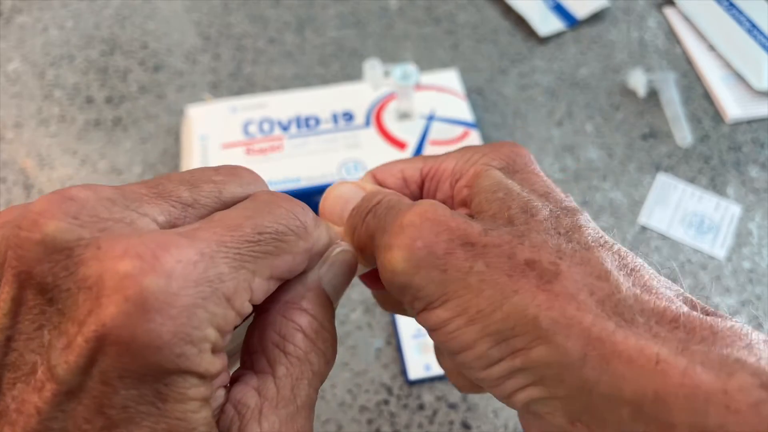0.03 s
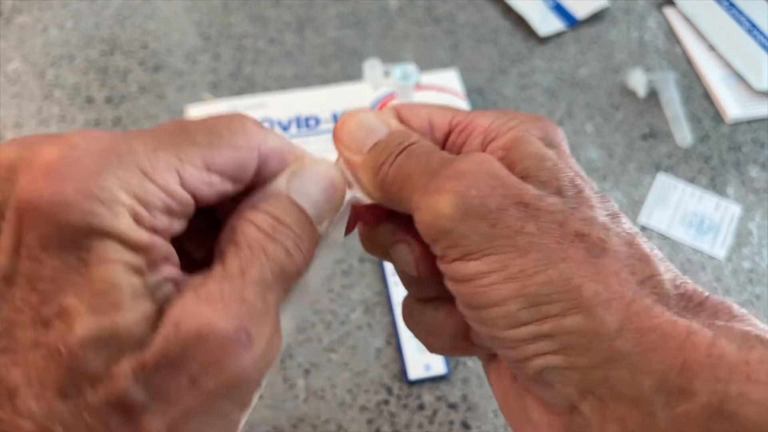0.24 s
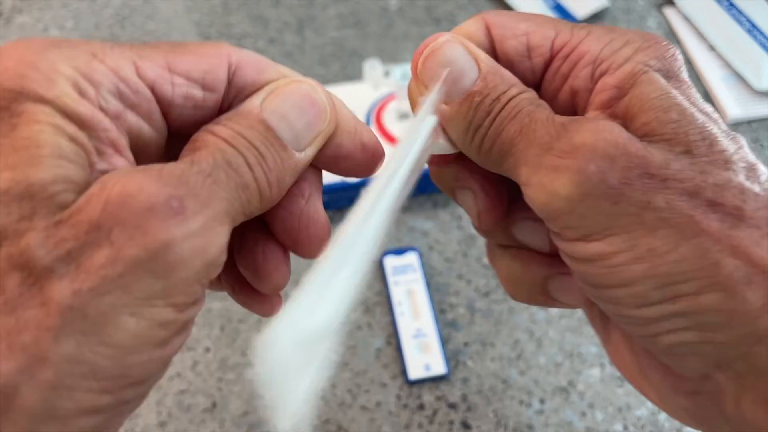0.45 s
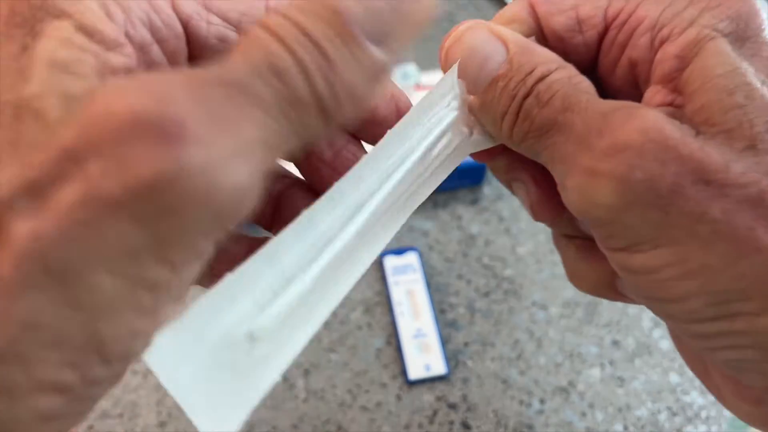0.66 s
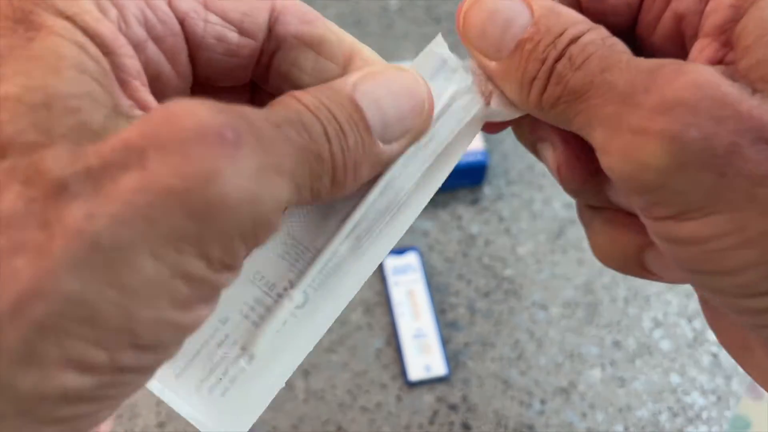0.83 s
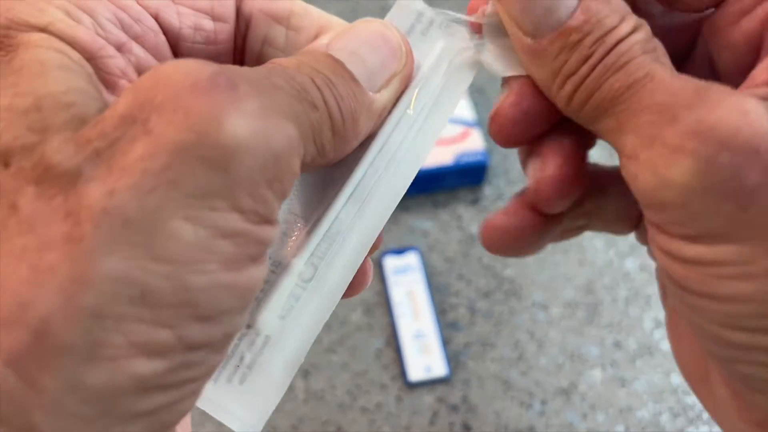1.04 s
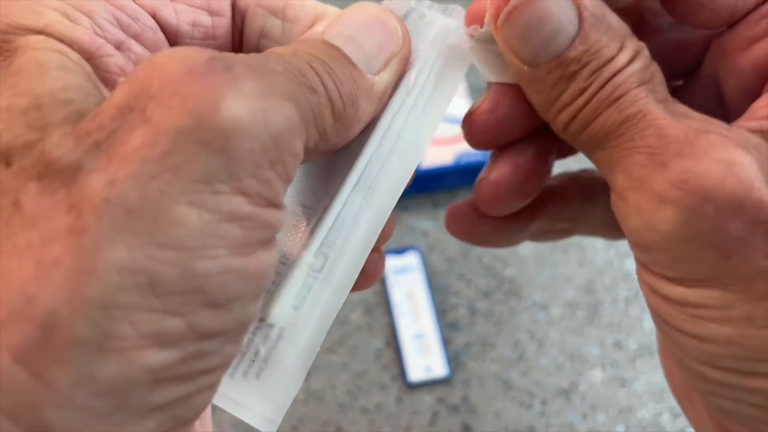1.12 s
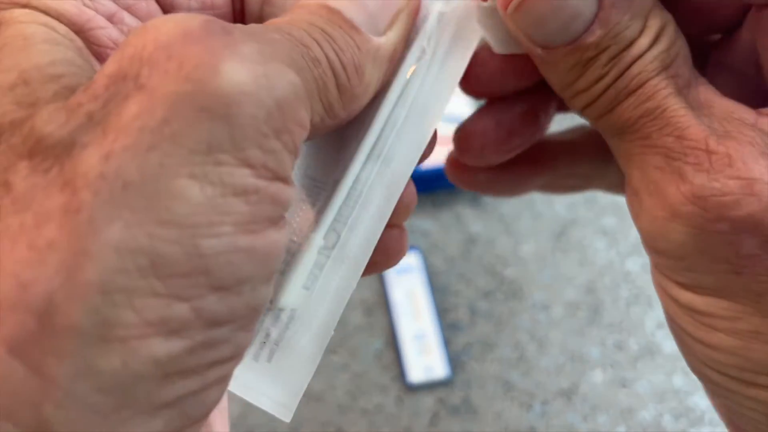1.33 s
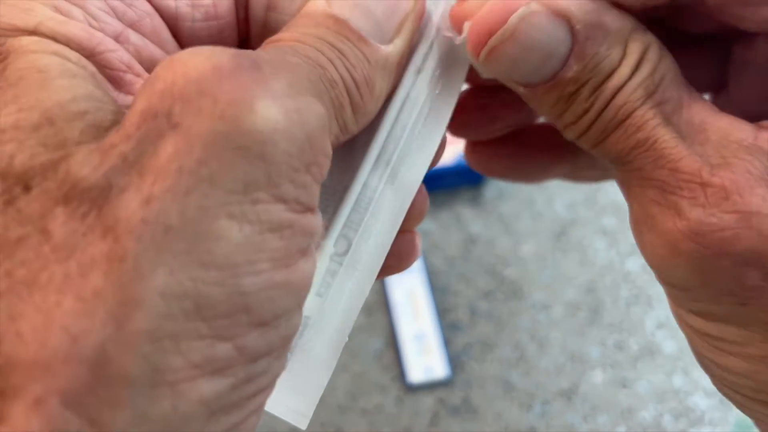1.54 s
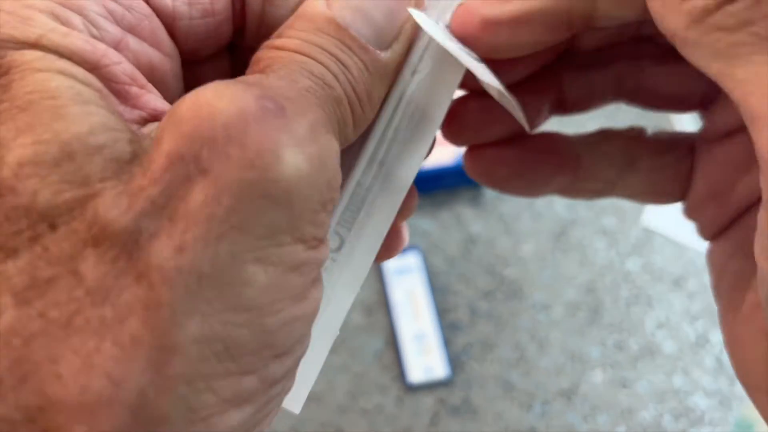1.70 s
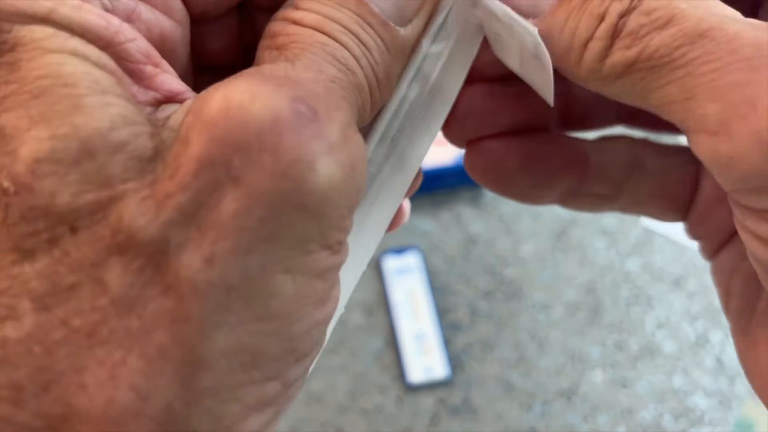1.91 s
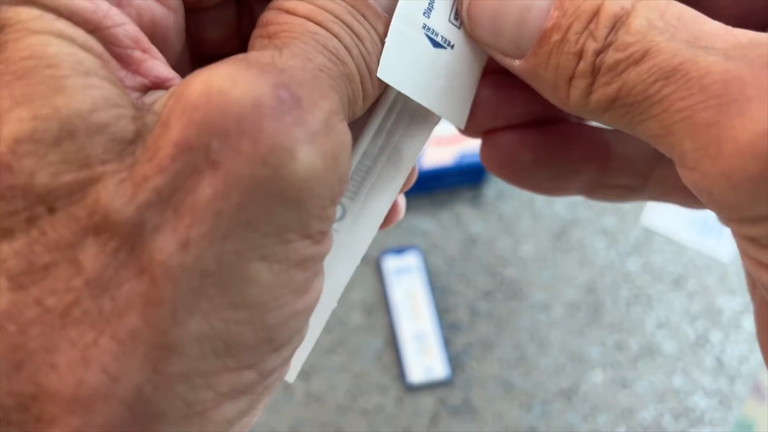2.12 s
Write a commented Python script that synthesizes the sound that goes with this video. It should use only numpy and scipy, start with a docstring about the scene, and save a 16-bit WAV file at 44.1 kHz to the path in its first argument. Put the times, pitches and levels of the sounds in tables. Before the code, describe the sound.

In a quiet kitchen with a faint electrical hum, a small paper wrapper is pulled apart by hand near a stereo microphone. A brief rising tear ends in a papery flick. Thin, bright crackles and ticks then come in stops and starts, with one louder snap past the middle and a few more near the end. A soft rustle and a slight room echo lie underneath.

```python
"""Low mains hum in a quiet kitchen; almost at once, fingers peel open a small paper wrapper close by.
The glued seam lets go in runs of tiny fibre breaks, the stiff paper snaps as it buckles,
and once the fingers slip off the edge with a flick. Skin rubs on the paper and the swinging
wrapper pushes air. A short room tail lies behind; a stereo microphone pair picks it all up."""
import sys
import numpy as np
from scipy import signal
from scipy.fft import rfft, irfft
from scipy.io import wavfile

SR = 44100
rng = np.random.default_rng(int(sys.argv[2]) if len(sys.argv) > 2 else 0)


def bounce(signal):
    """Save signal as a 16-bit WAV file at the path given by the first command-line argument."""
    frames = np.transpose(np.atleast_2d(signal))
    limited = np.clip(frames, -1, 1)
    pcm = np.round(limited * 32767).astype(np.int16)
    wavfile.write(sys.argv[1], SR, pcm)


N = 95564
TIME = np.arange(N) / SR
CLICK_GAIN = np.sqrt(.004 * SR)  # unit energy to unit rms over 4 ms


def amp(db):
    """Decibels to gain."""
    return 10 ** (np.asarray(db) / 20)


def value_at(points, hz):
    """Interpolates a table on a log-frequency axis."""
    freq_hz, value = np.transpose(points)
    return np.interp(np.log(hz + 1), np.log(freq_hz + 1), value)


def unit(x):
    """Scales each channel to unit energy."""
    return x / np.sqrt(np.sum(x ** 2, axis=-1, keepdims=True) + 1e-20)


def add(mix, start_s, sound):
    """Mixes a sound in at start_s."""
    part = mix[:, max(round(start_s * SR), 0):][:, :sound.shape[1]]
    part += sound[:, :part.shape[1]]


def colour(x, taps):
    """Convolves with shared or per-channel taps."""
    return signal.fftconvolve(np.atleast_2d(x), np.atleast_2d(taps), axes=1)


def response(spectrum, ring_hz=None, q=1, size=2048):
    """Minimum-phase, unit-energy impulse response with an optional resonance."""
    hz = abs(np.fft.fftfreq(size, 1 / SR)) + 1
    gain = amp(value_at(spectrum, hz))
    if ring_hz:
        gain = gain / np.hypot(1, q * (hz / ring_hz - ring_hz / hz))
    log_gain = np.log(np.maximum(gain, 1e-5))
    minimum_phase = np.exp(np.conj(signal.hilbert(log_gain)))
    return unit(np.fft.ifft(minimum_phase).real[:size // 2])


def wander(t, low_hz, high_hz):
    """Random drift from eight sines, rms about one."""
    return sum(np.sin(2 * np.pi * (hz * t + rng.random())) for hz in np.geomspace(low_hz, high_hz, 8)) / 2


# Mains hum: pitch_hz, level_db
HUM_TONES = [(58.5, -62.5), (119.8, -57.5)]
# Room air: freq_hz, gain_db
AIR_SPECTRUM = [(20, -39.5), (45, -6.5), (62, 9), (90, -3.5), (160, -6), (300, -17.5), (700, -28),
                (1200, -30), (3500, -31.5), (6000, -31), (7500, -25), (11000, -28), (15500, -32),
                (17000, -51)]


def hum_and_air(air_db=-64.0, waver=0.12, air_width=0.087):
    """An appliance hums and wavers a little over the still air of the kitchen."""
    hum = 0
    for pitch_hz, level_db in HUM_TONES:
        level = amp(level_db) * np.sqrt(2) * (1 + waver * wander(TIME, low_hz=.5, high_hz=6))
        hum += level * np.sin(2 * np.pi * (pitch_hz * TIME + rng.random()))
    air = rng.standard_normal(N) + air_width * rng.standard_normal((2, N))
    return hum + amp(air_db) * colour(air, response(AIR_SPECTRUM, size=8192))[:, :N]


def fibre_breaks(count, per_s, spread_db, hiss):
    """Fibres part at random with uneven strength over a smooth sliding hiss; unit rms."""
    strength = amp(spread_db * np.minimum(rng.exponential(1, count), 3))
    clicks = strength * rng.choice([-1, 1], count) * (rng.random(count) < per_s / SR)
    sliding = hiss * rng.standard_normal(count) / np.sqrt(count)
    return unit(unit(clicks) + sliding) * np.sqrt(count)


def shiver(decay_s, wave_gain, bounce_gain=0.621, bounce_s=.0009, size=400):
    """One break, its bounce off the hand, and waves in the sheet that reach each side differently."""
    t = np.arange(size) / SR
    kick = wave_gain * unit(rng.standard_normal((2, size)) * np.exp(-t / decay_s))
    kick[:, 0] = 1
    kick[:, round(bounce_s * rng.uniform(.7, 1.4) * SR)] += bounce_gain
    return kick


# Breaking fibres: freq_hz, gain_db
FIBRE_SPECTRUM = [(1200, -42), (2600, -4.5), (4000, -5.5), (6500, -4), (8500, 1.5), (10000, -5),
                  (11500, 1.5), (13000, -11.5), (15500, -1.5), (17000, -27.5)]
# Sheet body: freq_hz, gain_db
SHEET_SPECTRUM = [(100, -8), (250, -5), (550, 3.5), (950, -4), (1450, 5), (1900, 0), (2400, 3.5),
                  (3400, -2.5), (5200, -16), (8000, -15.5)]
# Seam peels or paper slides: start_s, end_s, level_db, swell_db, body_relative_db
SEAM_PULLS = [(0.147, 0.198, -55.5, 8.5, -4.5), (0.209, 0.29, -50, -14, -12),
              (0.283, 0.385, -41.5, 6.5, -11), (0.382, 0.393, -31.5, 8.5, -4.5),
              (0.689, 0.698, -53.5, 3, -5), (0.706, 0.719, -43.5, -9, -5.5), (0.731, 0.784, -52.5, -4, -10),
              (0.837, 0.896, -52.5, -5.5, -8), (0.889, 1.003, -47.5, 2.5, -14.5),
              (1.039, 1.106, -37.5, -0.5, -15), (1.158, 1.194, -45.5, -3.5, -13),
              (1.278, 1.349, -56.5, 2, -9), (1.455, 1.493, -44.5, 2, -18), (1.605, 1.679, -50.5, -4.5, -14),
              (1.772, 1.872, -64, -2, -1), (1.868, 1.974, -53, -4, -11), (2.056, 2.073, -43, -14, -17.5)]


def peeling(body_trim_db=-1, unsteady_db=1.47, base_per_s=1500, usual_db=-50, doubling_db=4.5):
    """Each pull is a swelling or fading run of fibre breaks, heard directly and through the sheet."""
    out, sheet = np.zeros((2, N)), response(SHEET_SPECTRUM)
    for start_s, end_s, level_db, swell_db, body_relative_db in SEAM_PULLS:
        length_s = end_s - start_s
        ramp_s = 0.00226 + 0.0496 * length_s
        t = np.arange(0, length_s + 4 * ramp_s, 1 / SR)
        uneven_glue_db = unsteady_db * wander(t, low_hz=20, high_hz=160)
        level = amp(level_db + swell_db * (np.minimum(t / length_s, 1) - .5) + uneven_glue_db)
        gate = np.minimum(t / ramp_s, 1) * np.exp(-np.maximum(t - length_s, 0) / ramp_s)
        # Harder pull: faster, smoother peel.
        per_s = base_per_s * 2 ** (max(level_db - usual_db, 0) / doubling_db)
        run = fibre_breaks(len(t), per_s, spread_db=5, hiss=.5) * level * gate
        # Taut sheet: bright and thin. Slack sheet: dull and full.
        tilt_db_per_octave = 0.6991 * (-11 - body_relative_db)
        fibres = response([(hz, db + tilt_db_per_octave * np.log2(hz / 7500)) for hz, db in FIBRE_SPECTRUM])
        grip = shiver(decay_s=.0005, wave_gain=.3, bounce_gain=.3)
        add(out, start_s, colour(run, unit(colour(grip, fibres))))
        add(out, start_s, amp(body_trim_db + body_relative_db) * colour(run, unit(colour(grip, sheet))))
    return out


# Buckling paper: freq_hz, gain_db
CRACK_SPECTRUM = [(800, -42), (2000, -18.5), (3200, 3.5), (5200, 4.5), (7000, -1), (9000, 4.5),
                  (12000, 0.5), (15500, 0), (17000, -22)]


def buckle(level_db, ring_hz):
    """One small stiff flap of paper clicks over and rings."""
    kick = shiver(decay_s=.0012, wave_gain=0.95)
    flap = response(CRACK_SPECTRUM, ring_hz, q=3.67)
    return amp(level_db) * CLICK_GAIN * unit(colour(kick, flap))


# Paper buckles or seam jumps: start_s, level_db, ring_hz, knock_db
PAPER_SNAPS = [(0.16, -40.5, 10920, -61.5), (0.2079, -36.5, 10300, -67.5), (0.2167, -36, 10800, -72),
               (0.2226, -33, 10400, -76), (0.4123, -28, 11070, -44.5), (0.5216, -41.5, 9601, -55),
               (0.7107, -31.5, 8920, -40.5), (0.7365, -43, 5700, -48), (0.7543, -36.5, 10160, -45.5),
               (0.8406, -37.5, 4560, -49), (0.893, -38, 8590, -56.5), (0.9609, -32, 10200, -70),
               (0.9649, -36.5, 8400, -48.5), (1.0287, -32, 9520, -56.5), (1.052, -27.5, 8800, -52),
               (1.06, -28, 8740, -45), (1.0642, -27.5, 8200, -36), (1.067, -26, 8480, -59),
               (1.0828, -28.5, 8700, -57.5), (1.096, -30.5, 8830, -48.5), (1.1625, -44, 11800, -59),
               (1.3715, -37, 12900, -84), (1.3942, -16, 11640, -42), (1.4407, -40, 6280, -80.5),
               (1.567, -36.5, 11380, -61), (1.619, -55, 3070, -48), (1.6382, -36.5, 9410, -52),
               (1.6572, -38, 11300, -50.5), (1.7735, -41, 11740, -82), (1.8441, -41, 15070, -64),
               (1.9153, -39.5, 9660, -55.5), (1.9877, -30.5, 9270, -51.5), (1.993, -28.5, 9065, -47),
               (2.0002, -30.5, 9030, -50), (2.028, -28, 9480, -49), (2.0539, -41.5, 5820, -60),
               (2.084, -38, 8800, -63.5), (2.0914, -39, 7410, -72.5), (2.1281, -45.5, 8600, -63.5)]


def snaps(snap_trim_db=-.5, knock_trim_db=-2, creak_rise_s=.002, creak_decay_s=0.0085):
    """Each buckle rings a flap and knocks the sheet; fibres creak just before and give way after."""
    out, sheet, fibres = np.zeros((2, N)), response(SHEET_SPECTRUM), response(FIBRE_SPECTRUM)
    t = np.arange(-4 * creak_rise_s, 6 * creak_decay_s, 1 / SR)
    creak_envelope = np.exp(np.minimum(t / creak_rise_s, -t / creak_decay_s))
    for start_s, level_db, ring_hz, knock_db in PAPER_SNAPS:
        add(out, start_s, buckle(level_db + snap_trim_db, ring_hz))
        knock = unit(colour(shiver(decay_s=.002, wave_gain=.45, bounce_gain=.35), sheet))
        add(out, start_s, amp(knock_db + knock_trim_db) * CLICK_GAIN * knock)
        creak = creak_envelope * fibre_breaks(len(t), per_s=900, spread_db=5, hiss=.4)
        creak_db = min(level_db - 15, -40)
        add(out, start_s + t[0], amp(creak_db) * colour(creak, fibres))
    return out


def glue_ticks(per_s=53, above_pull_db=1.5, scatter_db=6, ceiling_db=-44.5, ring_hz=10000):
    """Tougher spots in the glue let go with small buckles that follow the pull's level."""
    out = np.zeros((2, N))
    for start_s, end_s, level_db, swell_db, _ in SEAM_PULLS:
        count = int((end_s - start_s) * per_s)
        for k, (jitter, strength, detune) in enumerate(rng.uniform(-1.2, 1, (count, 3))):
            progress = (k + .5 + jitter / 2) / count
            tick_db = level_db + swell_db * (progress - .5) + above_pull_db + scatter_db * strength
            tick = buckle(min(tick_db, ceiling_db), ring_hz * 2 ** (detune / 4))
            add(out, start_s + progress * (end_s - start_s), tick)
    return out


# Fingers shift their hold: start_s, end_s, level_db
GRIP_SHIFTS = [(0.284, 0.393, -68.5), (0.676, 0.714, -63), (1.032, 1.173, -64.5), (1.481, 1.59, -65),
               (2.111, 2.173, -70)]
# Skin on paper: freq_hz, gain_db
SKIN_SPECTRUM = [(80, -39.5), (200, 4), (450, -3), (800, -15), (2000, -16.5), (6000, -44)]


def finger_rubs():
    """Skin slides on paper in small dull slips."""
    out, skin = np.zeros((2, N)), response(SKIN_SPECTRUM)
    for start_s, end_s, level_db in GRIP_SHIFTS:
        count = round((end_s - start_s) * SR)
        slips = fibre_breaks(count, per_s=400, spread_db=3, hiss=.8) * np.hanning(count)
        add(out, start_s, amp(level_db) * colour(slips, skin))
    return out


# Wrapper swings: start_s, envelope_peak_db, pitch_hz
WRAPPER_SWINGS = [(0.336, -37, 906), (0.338, -34.5, 1850), (0.3916, -23.5, 538.5), (0.392, -26.5, 1000),
                  (0.393, -39.5, 204.2), (0.4, -41.5, 57), (0.715, -46, 226.4), (0.741, -43.5, 71),
                  (1.122, -45.5, 92.5), (1.3945, -39, 456.8), (1.3961, -31, 1780), (1.598, -48, 341),
                  (1.627, -48, 272), (1.915, -46.5, 1020)]


def swings(rise_cycles=0.526):
    """The sheet or whole wrapper pushes air in heavily damped swings: the slower, the longer."""
    out, t = np.zeros((2, N)), TIME[None, :SR // 5]
    for start_s, envelope_peak_db, pitch_hz in WRAPPER_SWINGS:
        age = t * pitch_hz / rise_cycles
        envelope = amp(envelope_peak_db) * age * np.exp(1 - age)
        add(out, start_s, envelope * np.sin(2 * np.pi * pitch_hz * t))
    return out


def rustle(fibre_db=-62.5, body_db=-72, hold_s=0.652, rise_s=0.084, loose_db=-31):
    """A faint steady rustle comes up once both hands hold the wrapper."""
    hold = np.interp(TIME, [hold_s, hold_s + rise_s], [amp(loose_db), 1])
    paper = amp(fibre_db) * response(FIBRE_SPECTRUM) + amp(body_db) * response(SHEET_SPECTRUM)
    run = hold * fibre_breaks(N, per_s=500, spread_db=6, hiss=.6)
    grip = unit(shiver(decay_s=0.000943, wave_gain=0.953))
    return colour(run, colour(grip, paper))[:, :N]


# Room tail colour: freq_hz, gain_db
TAIL_SPECTRUM = [(300, 3), (2000, 3), (5000, 2), (9000, 0.5), (12000, -1), (16000, -11.5)]
# Room tail decay: freq_hz, t60_s
TAIL_DECAY = [(200, 0.588), (1000, 0.412), (5000, 0.627), (9000, 0.358), (16000, 0.24)]


def kitchen_echo(x, predelay_s=0.0033):
    """A diffuse tail per side; the top treble comes back weaker and dies first."""
    hz, t, noise = signal.stft(rng.standard_normal((2, SR // 2)), SR, nperseg=256)
    fade_db = value_at(TAIL_SPECTRUM, hz)[:, None] - 60 * t / value_at(TAIL_DECAY, hz)[:, None]
    tail = signal.istft(noise * amp(fade_db), SR, nperseg=256)[1]
    tail *= np.arange(tail.shape[1]) / SR > predelay_s
    return colour(x, unit(tail))[:, :N]


def scene(room_db=-18.0):
    """The wrapper close by, its echo in the kitchen, and the hum."""
    paper = snaps() + peeling() + glue_ticks() + rustle() + swings() + finger_rubs()
    return paper + amp(room_db) * kitchen_echo(paper) + hum_and_air()


# Microphone balance: freq_hz, left_minus_right_db
MIC_BALANCE = [(50, 3), (150, 4.5), (1000, 5), (3200, 5.5), (4300, 3.5), (6800, 3.5), (8200, 0), (16000, 0)]
# Microphone phase below the split: freq_hz, left_lead_rad
MIC_PHASE = [(1200, 0.554), (1900, 0.37), (2400, 2.485), (3400, 1.385), (4100, 0.535), (7000, 1.186)]


def record(dry, split_hz=7500, treble_width=0.234, left_delay_s=.000247, low_hz=22, high_hz=16700):
    """Two microphone ports: wide and leaning left below the split; above it nearly alike, left late."""
    hz = np.fft.rfftfreq(N, 1 / SR)
    treble = np.clip((hz - split_hz) / 600 + .5, 0, 1)
    left, right = rfft(dry * signal.windows.tukey(N, .008))
    mid, side = (left + right) / 2, (left - right) / 2
    side *= 1 + (treble_width - 1) * treble
    lead = np.exp(1j * value_at(MIC_PHASE, hz))
    lag = np.exp(-2j * np.pi * hz * left_delay_s)
    left_shift = (1 - treble) * lead + treble * lag
    lean = amp(value_at(MIC_BALANCE, hz) / 2)
    ports = np.array([(mid + side) * left_shift * lean, (mid - side) / lean])
    low_cut = (1j * hz / (1j * hz + low_hz)) ** 2
    high_cut_taps = signal.firwin(255, high_hz, window=("kaiser", 9), fs=SR)
    return signal.oaconvolve(irfft(ports * low_cut, N), high_cut_taps[None], "same")


dry = scene()
out = record(dry)
bounce(out)
```